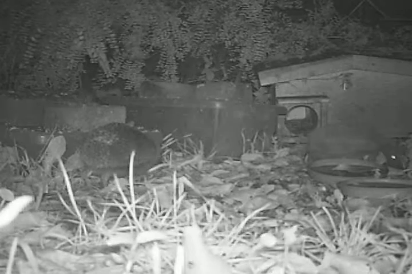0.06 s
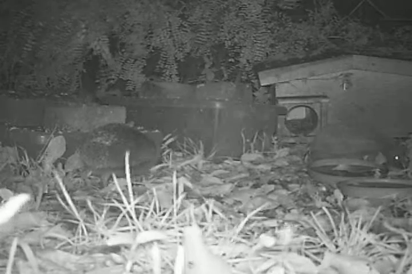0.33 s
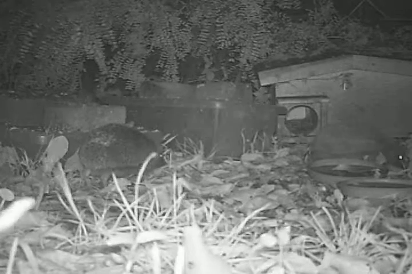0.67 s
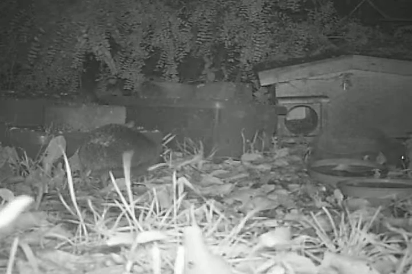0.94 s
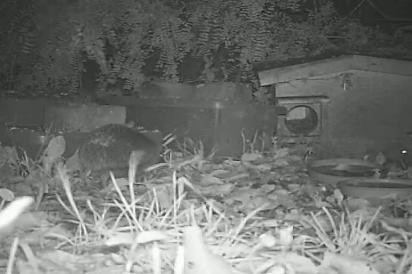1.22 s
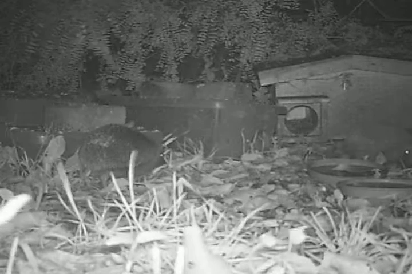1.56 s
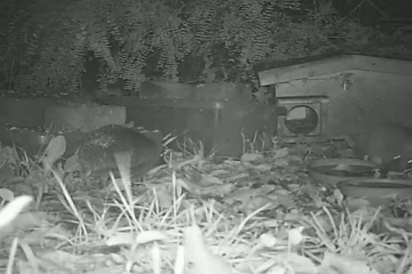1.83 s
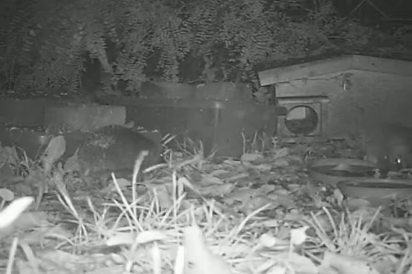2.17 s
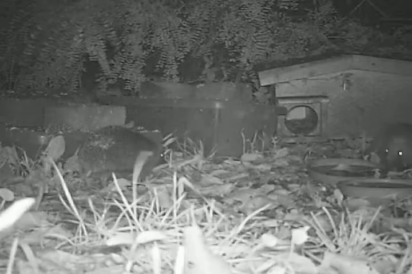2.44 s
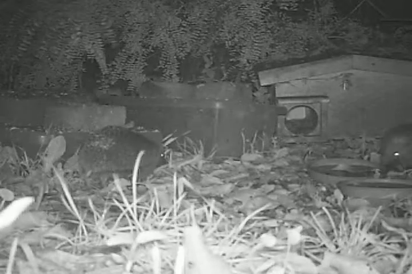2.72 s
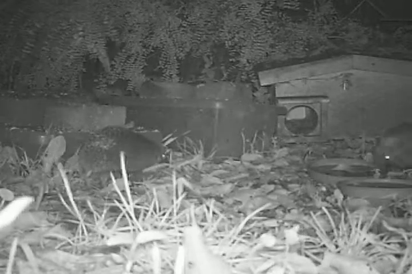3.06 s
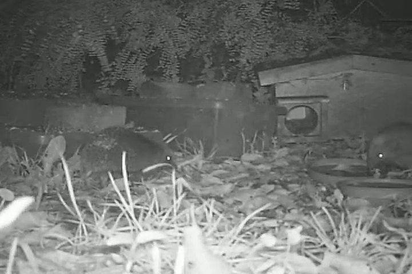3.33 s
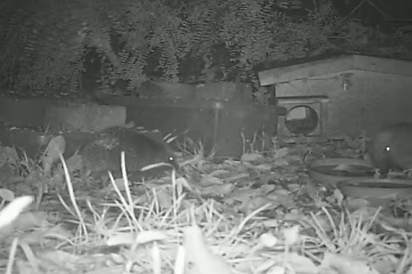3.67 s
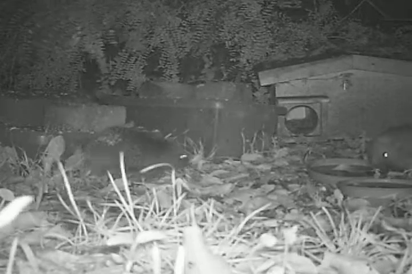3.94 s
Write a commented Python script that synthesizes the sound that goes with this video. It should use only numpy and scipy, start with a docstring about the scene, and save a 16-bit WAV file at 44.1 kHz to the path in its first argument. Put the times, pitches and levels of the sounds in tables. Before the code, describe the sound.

Soft wind buffets the microphone and fades, while a hedgehog faintly scuffs dry garden leaves.

```python
"""A garden at night, heard by a small wildlife camera. A breeze buffets the microphone with rumble,
eddies and single puffs, sets dry leaves crackling and dies down, returning softly near the end.
Under it lie the two low notes of a distant engine, a steady hiss and the camera's thin whine.
Hedgehogs shift in the dry litter: stems give a few faint ticks and knocks, and near the end
a foot makes one short scuff, a cluster of grainy cracks."""
import sys
import numpy as np
from scipy import signal
from scipy.fft import rfft, irfft
from scipy.io import wavfile
from scipy.ndimage import uniform_filter1d

SR = 44100
rng = np.random.default_rng(int(sys.argv[2]) if len(sys.argv) > 2 else 0)


def log_audio(samples):
    """Write samples as a 16-bit WAV file to the path given in sys.argv[1]."""
    # one column per channel
    frames = np.atleast_2d(samples).T
    # limit to full scale, then quantise
    limited = np.clip(frames, -1, 1)
    pcm = np.round(limited * 32767).astype(np.int16)
    wavfile.write(sys.argv[1], SR, pcm)


N = 176400

# breeze rumble envelope, before RUMBLE_GAIN_DB (time [s], level [dB])
RUMBLE_ENVELOPE = [(0, -37), (.09, -40), (.2, -38.5), (.3, -46.5), (.42, -47.5), (.52, -40), (.62, -50),
                   (.75, -45), (.84, -52), (.92, -41.5), (1.0, -45.5), (1.1, -46), (1.19, -46),
                   (1.27, -53.5), (1.35, -46.5), (1.44, -51), (1.7, -54.5), (2.1, -60.5), (2.9, -60.5),
                   (3.42, -52), (3.56, -55.5), (3.65, -49.5), (3.72, -52.5), (3.8, -48), (4, -54.5)]
# fine turbulence envelope, before EDDY_GAIN_DB (time [s], level [dB])
EDDY_ENVELOPE = [(0, -46), (.09, -57), (.14, -45.5), (.33, -49), (.41, -57), (.49, -58.5), (.54, -58.5),
                 (.6, -53.5), (.67, -62), (.85, -70), (.89, -49), (.93, -68), (.97, -56.5), (1.03, -61.5),
                 (1.09, -52), (1.14, -53), (1.165, -62), (1.2, -57.5), (1.25, -56), (1.3, -76),
                 (1.55, -66.5), (1.7, -75.5), (3.1, -77.5), (3.17, -65), (3.27, -75), (3.6, -70.5),
                 (3.77, -67), (4, -81)]
# tone of the slow rumble (frequency [Hz], relative level [dB])
RUMBLE_SPECTRUM = [(8, -0.5), (16, 0), (30, 2), (55, -6.5), (85, -11.5), (115, -27.5), (200, -42.5),
                   (400, -71.5)]
# tone of the turbulence (frequency [Hz], relative level [dB])
EDDY_SPECTRUM = [(40, -14.5), (75, 0.5), (105, -1.5), (160, -11.5), (250, -20.5), (400, -31.5), (700, -48),
                 (1500, -63)]
# puffs that thump the mic (time [s], push level [dB], half width [s], direction [+1 press, -1 suck])
AIR_PUFFS = [(0.139, -28.5, 0.002, 1), (0.166, -25, 0.0034, -1), (0.288, -27.5, 0.0027, -1),
             (0.502, -32, 0.0024, -1), (0.591, -32, 0.0019, 1), (0.627, -36, 0.0031, 1),
             (0.816, -35, 0.003, -1), (0.878, -23, 0.0033, -1), (0.960, -29, 0.0034, -1),
             (0.967, -33, 0.0022, 1), (1.074, -29.5, 0.0034, 1), (1.188, -33.5, 0.0021, 1)]
# tone of the fizz riding on the air pressure (frequency [Hz], relative level [dB])
FIZZ_SPECTRUM = [(300, -9), (1500, 1), (3000, 3), (6000, -1.5), (10000, -1.5), (16000, -2)]
# envelope of dry leaves in the breeze (time [s], level [dB])
CRACKLE_ENVELOPE = [(0, -90), (.16, -81), (.36, -85), (.5, -78.5), (.75, -85), (.9, -88), (1.0, -85),
                    (1.08, -79), (1.22, -94), (1.6, -100)]
# tone of the leaf crackle (frequency [Hz], relative level [dB])
CRACKLE_SPECTRUM = [(1200, -22), (2600, 4), (4000, -1), (8000, -9), (15000, -18)]
# distant engine envelope (time [s], level [dB])
ENGINE_ENVELOPE = [(0, -58), (1.5, -66.5), (2.1, -57.5), (2.8, -64.5), (3.1, -61), (3.4, -62), (4, -73)]
# the engine's notes (frequency [Hz], relative level [dB])
ENGINE_NOTES = [(89.8, -0.5), (52.1, -12.5)]
# tone of the garden and microphone hiss (frequency [Hz], relative level [dB])
HISS_SPECTRUM = [(20, 16.5), (55, 8), (120, 7), (200, 5.5), (320, 1.5), (550, -1), (950, -3.5), (1400, -10),
                 (2200, -9), (2700, -8), (3150, -9.5), (3700, -14), (5500, -18), (8000, -19), (10000, -21),
                 (12500, -20), (16000, -22.5)]
# envelope of the narrow, ringing band in the hiss (time [s], level [dB])
HISS_RING_ENVELOPE = [(0, -79), (.75, -85.5), (1.85, -80), (2.2, -83), (3.05, -83), (3.3, -80), (3.52, -79),
                      (3.65, -87), (4, -78)]
# tones of the camera electronics (frequency [Hz], level [dB])
WHINE_TONES = [(13630, -99.5), (15623, -96.5)]
# envelope of the faintly stirring litter (time [s], level [dB])
STIR_ENVELOPE = [(0, -89.5), (1.35, -86.5), (1.7, -89), (3.55, -92), (3.68, -90), (3.88, -87), (4, -95)]
# ringing clicks: knocks on stems and hollow litter, and at 0.8747 s a click during the big puff (time [s], peak
# level [dB], frequency [Hz], rise [s])
RINGING_CLICKS = [(0.8747, -65, 3880, .0015), (1.376, -66, 3330, 0.0022), (2.1045, -72, 11000, .0013),
                  (3.7262, -60, 10200, .0008), (3.727, -62, 1250, .0028), (3.734, -65, 1290, .0025),
                  (3.7417, -56, 1250, 0.0016), (3.750, -53.5, 1250, 0.0015), (3.7536, -63, 1090, 0.0011),
                  (3.764, -60, 1280, .0012), (3.858, -66, 10000, .0008), (3.8616, -69, 10250, .0009)]
# short ticks, mostly of dry stems; at 0.8757 s a tick during the big puff (time [s], level [dB], centre [Hz],
# bandwidth [Hz])
SHORT_TICKS = [(0.8757, -59.5, 4500, 2600), (0.888, -70, 5000, 4000), (0.907, -65, 4400, 5000),
               (1.378, -71, 3260, 700), (2.104, -74, 5000, 2000), (3.905, -67, 3180, 900)]
# leaves cracking underfoot (time [s], body level [dB], paper level [dB], crisp level [dB], decay [s])
LEAF_CRACKS = [(2.103, -72, -69, -75, 0.0056), (3.7255, -70, -76, -61, 0.009),
               (3.733, -67, -70, -64, 0.0096), (3.742, -68, -66.5, -75, 0.0055),
               (3.749, -63, -63.5, -76, 0.005), (3.7527, -69, -63.5, -69, 0.008),
               (3.764, -74, -72, -67, 0.0065), (3.799, -92, -80, -78, .004), (3.837, -77, -70, -72, 0.003),
               (3.851, -83, -74, -76, .003), (3.8575, -91, -81, -72, 0.0041)]

RUMBLE_GAIN_DB, EDDY_GAIN_DB = 3, 5
EDDY_FLUTTER_DB, EDDY_FLUTTER_HZ = 2.2, 28.03
REBOUND_SHARE, REBOUND_WIDTH = 0.19, 5.3  # a puff's backswing, relative to its push
FIZZ_GAIN_DB, FIZZ_SMEAR_S, FIZZ_SMEAR_SHARE = -37.5, 0.03, 0.24
ENGINE_PITCH_DRIFT, WHINE_DRIFT_HZ, HISS_DB = 0.0066, 2.9, -65
CRACK_ATTACK_S, TICK_DECAY_S = 0.00063, 0.0019
FADE_IN_S, HIGH_CUT_HZ = .004, 15780


def undb(db):
    """Decibels to gain."""
    return 10 ** (np.asarray(db) / 20)


def unit(x):
    """Scale to rms 1."""
    return x / np.std(x)


def envelope(points):
    """Gain curve through (time [s], level [dB]) points."""
    times, db = np.array(points).T
    return undb(np.interp(np.arange(N) / SR, times, db))


def noise(spectrum):
    """Noise of rms 1, shaped by (frequency [Hz], relative level [dB]) points."""
    hz, db = np.array(spectrum).T
    bins_hz = np.maximum(np.fft.rfftfreq(N, 1 / SR), 1)
    eq = undb(np.interp(np.log(bins_hz), np.log(hz), db))
    return unit(irfft(rfft(rng.standard_normal(N)) * eq, N))


def drift(rate_hz):
    """Smooth random modulation with spread 1."""
    hold = max(int(SR / rate_hz), 1)
    steps = np.repeat(rng.standard_normal(N // hold + 1), hold)
    return unit(uniform_filter1d(steps, hold)[:N])


def flutter(depth_db, rate_hz):
    """A gain that wavers at random around 1."""
    return undb(depth_db * drift(rate_hz))


def grains(depth_db=1.5, rate_hz=916):
    """White noise of rms 1, roughened by fast flutter."""
    return unit(flutter(depth_db, rate_hz) * rng.standard_normal(N))


def band(x, hz, width_hz, order=2):
    """A steep band-pass that keeps the level of white noise."""
    half = min(width_hz, 4 * hz) / 2
    low = np.hypot(hz, half) - half
    high = min(low + 2 * half, SR / 2 - 1)
    sos = signal.butter(order, [low, high], "bandpass", fs=SR, output="sos")
    noise_gain = np.linalg.norm(signal.sosfilt(sos, signal.unit_impulse(SR // 20)))
    return signal.sosfilt(sos, x + 1e-18) / noise_gain


def burst(start, decay):
    """Envelope of a crack: sharp attack, exponential tail."""
    age = np.clip(np.arange(N) / SR - start, 0, 1)
    attack = np.minimum(age / CRACK_ATTACK_S, 1)
    return attack * np.exp(-np.maximum(age - CRACK_ATTACK_S, 0) / decay)


def turbulence(spectrum):
    """Churning air pressure, levelled over about a tenth of a second."""
    pressure = noise(spectrum)
    power = uniform_filter1d(uniform_filter1d(pressure ** 2, SR // 20), SR // 20)
    return pressure / np.sqrt(power)


def wind():
    """Rumble, eddies and puffs press on the microphone; a fine fizz rides the pressure."""
    rumble = undb(RUMBLE_GAIN_DB) * envelope(RUMBLE_ENVELOPE) * turbulence(RUMBLE_SPECTRUM)
    eddy_gain = undb(EDDY_GAIN_DB) * flutter(EDDY_FLUTTER_DB, EDDY_FLUTTER_HZ)
    eddies = eddy_gain * envelope(EDDY_ENVELOPE) * turbulence(EDDY_SPECTRUM)
    air = rumble + eddies + sum(puff(*row) for row in AIR_PUFFS)
    smeared = uniform_filter1d(np.abs(air), int(FIZZ_SMEAR_S * SR))
    follower = (1 - FIZZ_SMEAR_SHARE) * np.abs(air) + FIZZ_SMEAR_SHARE * smeared
    return air + undb(FIZZ_GAIN_DB) * follower * noise(FIZZ_SPECTRUM)


def leaf_crackle():
    """Dry leaves crackle finely through the opening gusts."""
    texture = unit(flutter(depth_db=8, rate_hz=401) * noise(CRACKLE_SPECTRUM))
    return envelope(CRACKLE_ENVELOPE) * texture


def engine():
    """A far engine, of which only two low, wavering notes arrive."""
    clock = np.cumsum(1 + ENGINE_PITCH_DRIFT * drift(rate_hz=5.5)) / SR
    notes = sum(np.sqrt(2) * undb(db) * np.sin(2 * np.pi * hz * clock) for hz, db in ENGINE_NOTES)
    return notes * envelope(ENGINE_ENVELOPE) * flutter(depth_db=0.65, rate_hz=8.2)


def hiss():
    """A bed of garden and microphone hiss, with a faint ringing band that swells and sinks."""
    bed = undb(HISS_DB) * flutter(depth_db=0.67, rate_hz=2.97) * noise(HISS_SPECTRUM)
    ringing = band(rng.standard_normal(N), hz=2890, width_hz=480)
    return bed + envelope(HISS_RING_ENVELOPE) * ringing


def camera_whine(hz, db):
    """One thin, unsteady tone from the camera's electronics."""
    cycles = np.cumsum(hz + WHINE_DRIFT_HZ * drift(rate_hz=24)) / SR
    return np.sqrt(2) * undb(db) * np.sin(2 * np.pi * cycles)


def litter_stir():
    """Shifting hedgehogs stir the litter into a faint, high rustle."""
    rustle = envelope(STIR_ENVELOPE) * grains(depth_db=3.5, rate_hz=115.8)
    return band(rustle, hz=10080, width_hz=2100, order=3)


def puff(centre, db, half_width, direction):
    """A puff of air thumps the microphone: a quick push, then a broad, shallow backswing."""
    offset = (np.arange(N) / SR - centre) / half_width
    push = 1 / (1 + offset ** 2 / 2) ** 2
    rebound = 1 / (1 + (offset / REBOUND_WIDTH - 1) ** 2 / 2) ** 2
    return direction * undb(db) * (push - REBOUND_SHARE * rebound)


def ringing_click(start, db, hz, rise):
    """A brief, damped ringing note: a knocked stem or hollow litter, or a click during a puff."""
    age = np.clip(np.arange(N) / SR - start, 0, .1)
    swell = (age / rise * np.exp(1 - age / rise)) ** 2
    return undb(db) * swell * np.sin(2 * np.pi * hz * age)


def short_ticks():
    """Short ticks, each a tiny burst of grains in its own band: dry stems, and one tick during the big puff."""
    snap = grains()
    return sum(undb(db) * band(burst(start, TICK_DECAY_S) * snap, hz, width_hz)
               for start, db, hz, width_hz in SHORT_TICKS)


def foot_scuff():
    """Leaves crack under a hedgehog's foot: body from the soil, papery mids and a crisp top."""
    power = sum((undb(levels)[:, None] * burst(start, decay)) ** 2
                for start, *levels, decay in LEAF_CRACKS)
    body, paper, crisp = np.sqrt(power)
    return (band(body * grains(), hz=805, width_hz=750)
            + band(paper * grains(), hz=2800, width_hz=2200, order=4)
            + band(crisp * grains(), hz=10080, width_hz=2100, order=3))


def scene():
    """Breeze, background and hedgehogs, mixed to mono at one microphone."""
    breeze = wind() + leaf_crackle()
    background = engine() + hiss() + sum(camera_whine(*row) for row in WHINE_TONES)
    knocks = sum(ringing_click(*row) for row in RINGING_CLICKS)
    hedgehogs = litter_stir() + knocks + short_ticks() + foot_scuff()
    return (breeze + background + hedgehogs)[None]


def record(dry):
    """The camera fades in quickly and cuts the extreme top."""
    fade_in = np.minimum(np.arange(N) / SR / FADE_IN_S, 1)
    high_cut = signal.ellip(12, .1, 70, HIGH_CUT_HZ, fs=SR, output="sos")
    return signal.sosfilt(high_cut, dry * fade_in)


dry = scene()
out = record(dry)
log_audio(out)
```